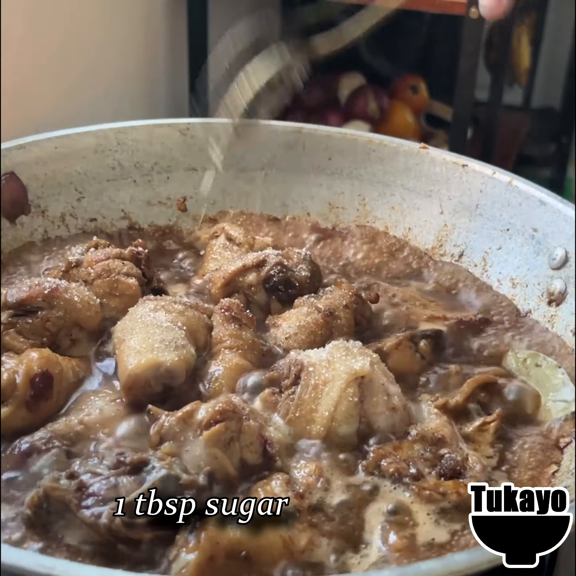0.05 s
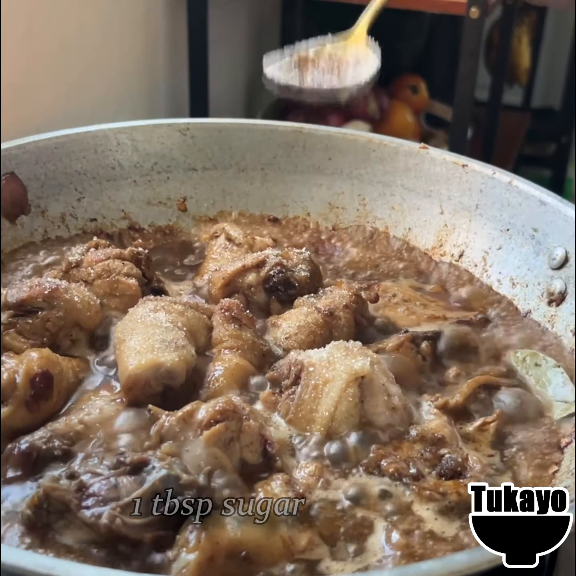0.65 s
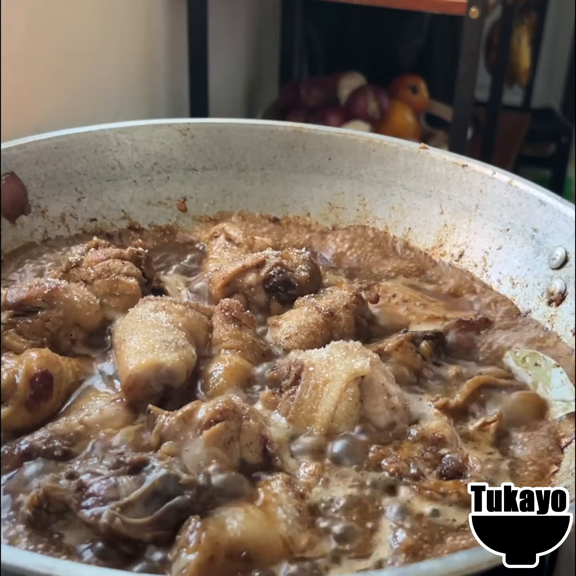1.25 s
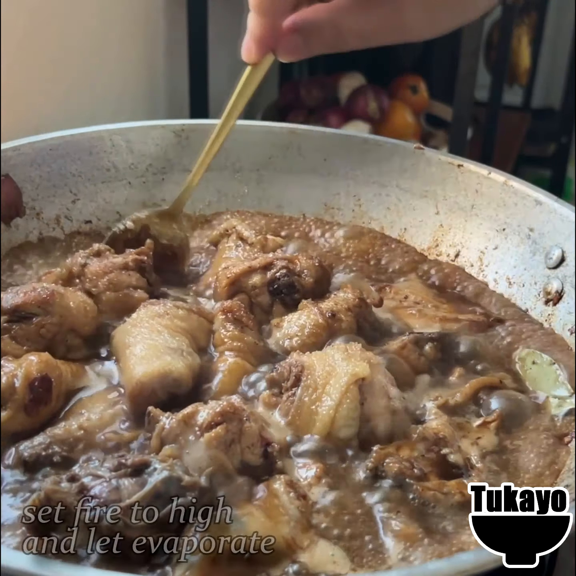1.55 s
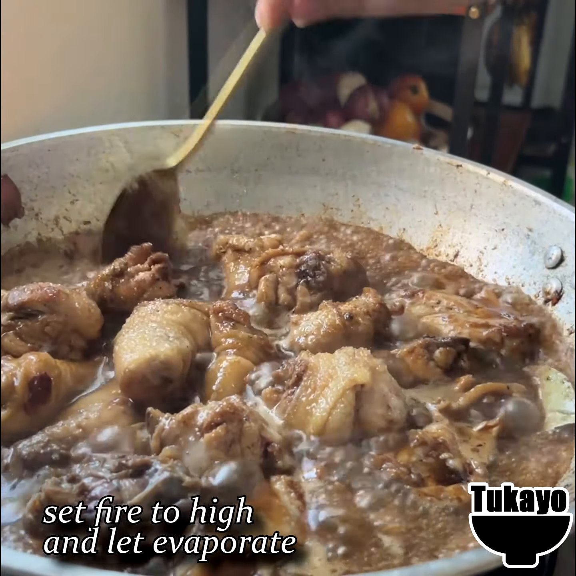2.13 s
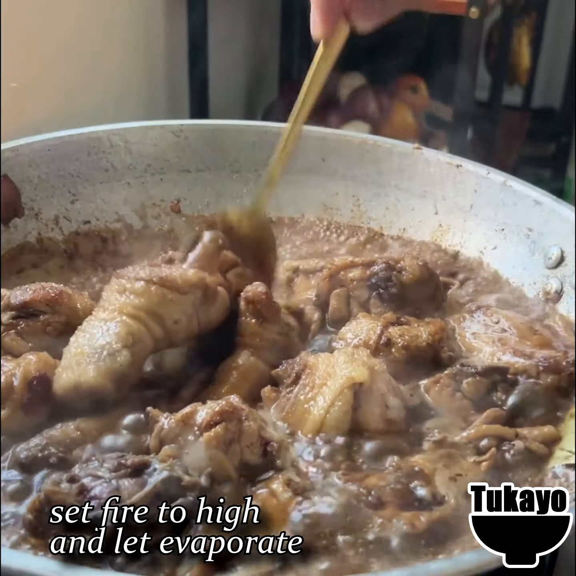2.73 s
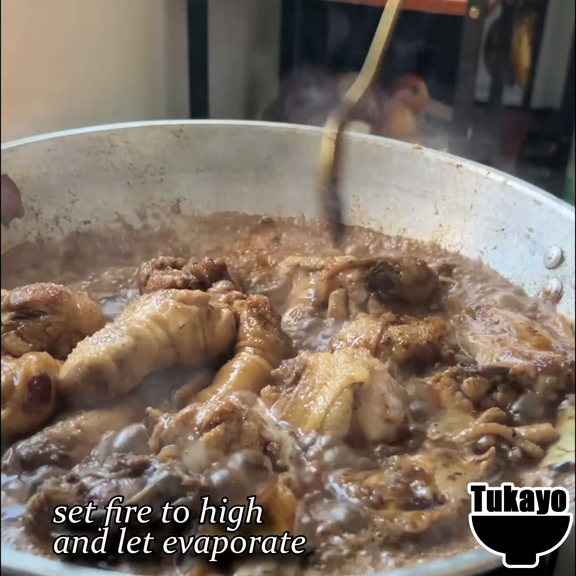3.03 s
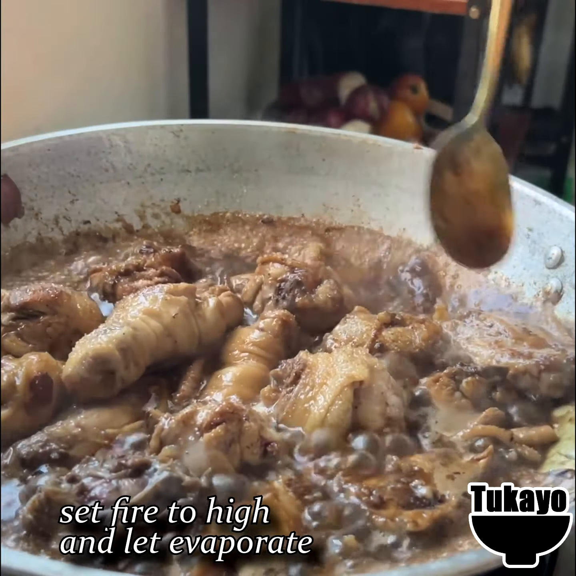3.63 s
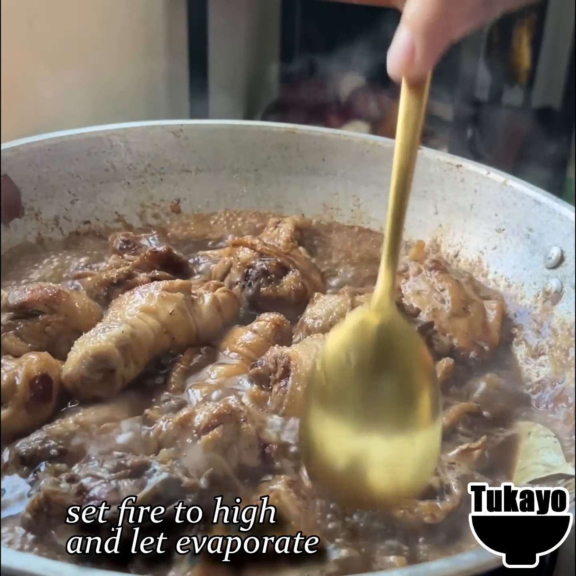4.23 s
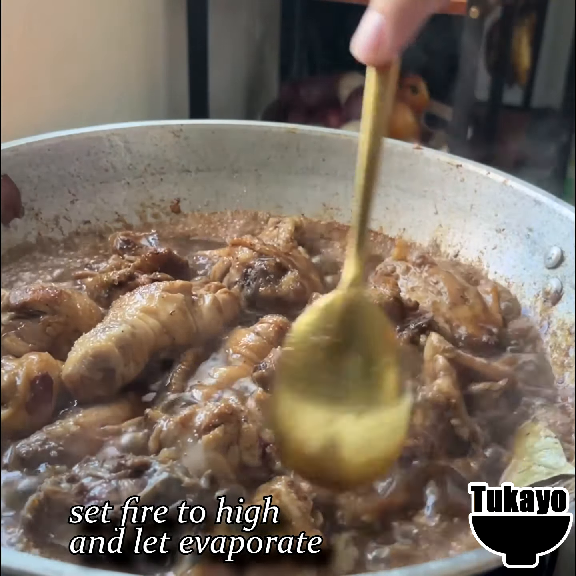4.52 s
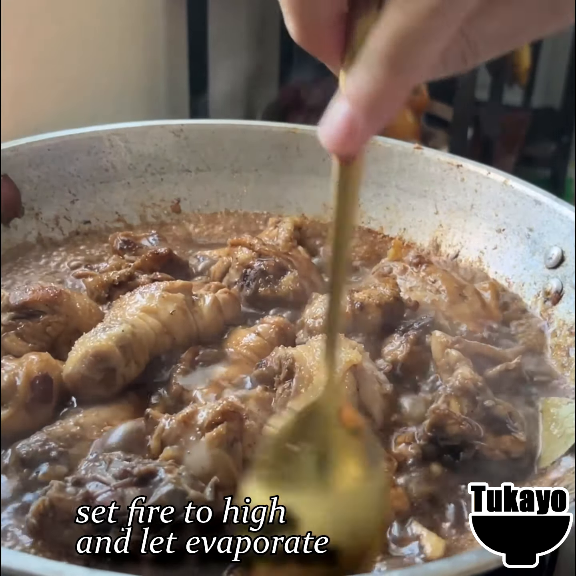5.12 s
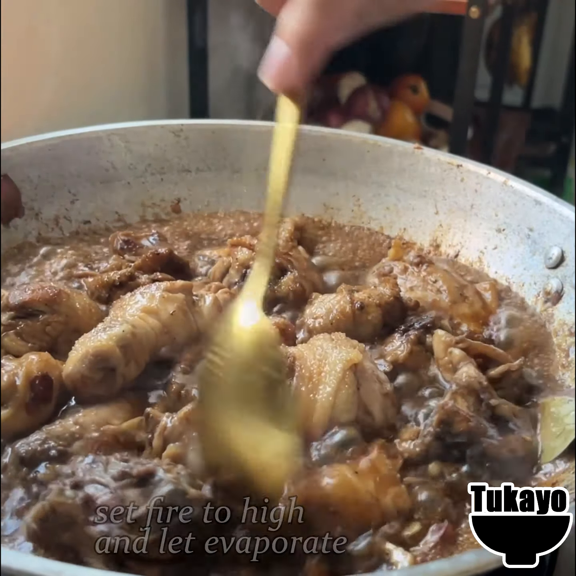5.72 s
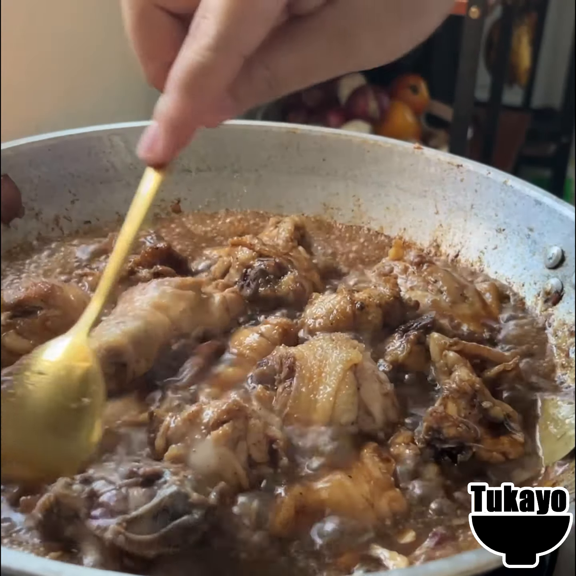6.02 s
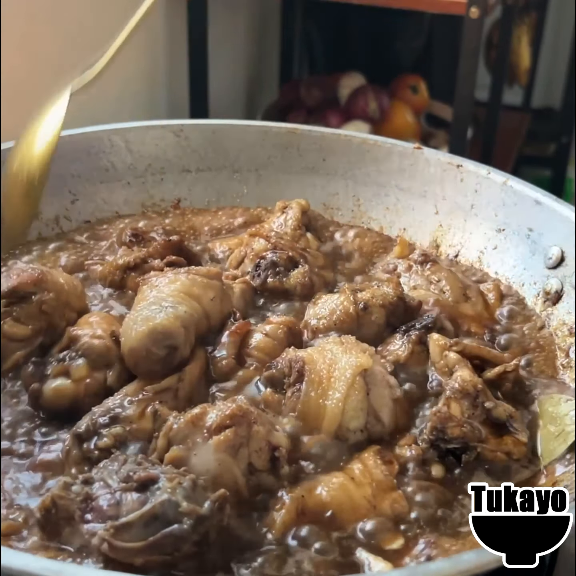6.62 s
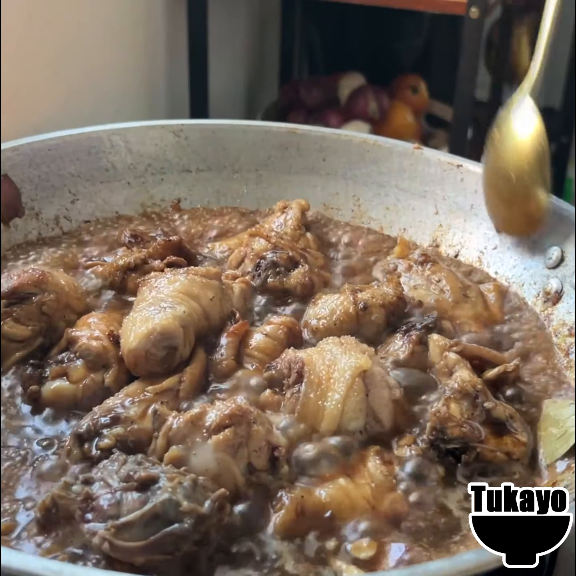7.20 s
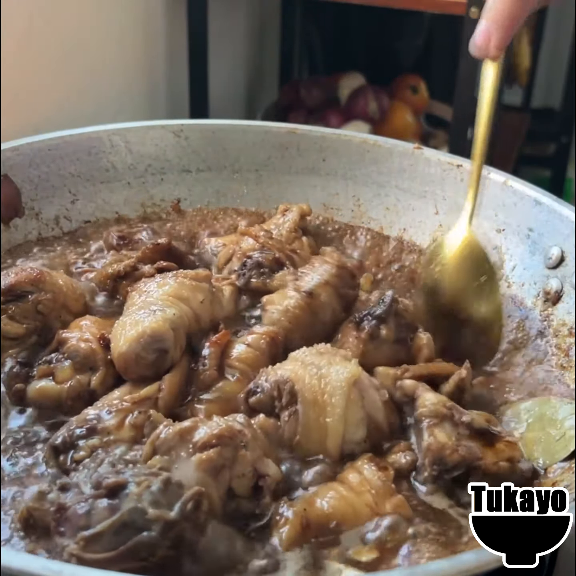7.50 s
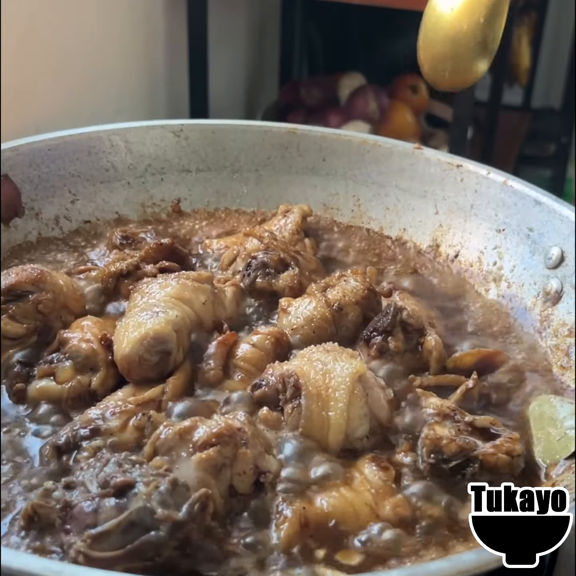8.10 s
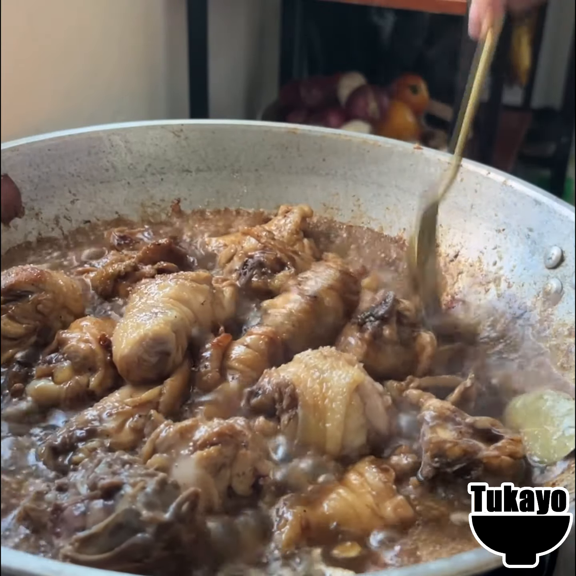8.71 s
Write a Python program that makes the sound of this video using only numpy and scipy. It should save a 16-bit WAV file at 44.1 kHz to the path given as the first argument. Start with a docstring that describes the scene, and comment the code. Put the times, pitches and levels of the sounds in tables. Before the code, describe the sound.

In a small kitchen, sauce boils hard around chicken in a wide metal pan, bubbling and fizzing over a low rumble. A spoon clinks once on a dish, then turns the pieces with soft wet sloshes. It knocks and briefly scrapes the pan at uneven intervals, loudest about halfway through. The boil carries on throughout, heard close beside the rim with a slight room echo.

```python
"""A small kitchen: sauce boils hard around chicken in a wide aluminium pan, with fizz, bursting
bubbles, a low rumble over the burner and a faint hollow tone. A spoon clinks once on a dish, then
turns the pieces: the sauce sloshes, and knocks and scrapes ring the pan's floor and wall and the spoon.
The room echoes the spoon; two closely spaced microphone ports listen from beside the rim."""
import sys
import numpy as np
from scipy import signal
from scipy.fft import rfft, irfft, next_fast_len
from scipy.io import wavfile
from scipy.ndimage import map_coordinates

SR = 44100
rng = np.random.default_rng(int(sys.argv[2]) if len(sys.argv) > 2 else 0)


def file_out(sig):
    """Save sig as 16-bit WAV at sys.argv[1]."""
    # one column per channel
    cols = np.atleast_2d(sig).T
    # limit, then scale
    lim = np.clip(cols, -1, 1)
    pcm = np.round(lim * 32767).astype(np.int16)
    wavfile.write(sys.argv[1], SR, pcm)


N = 385875

# slow drift of the boil: time_s, rumble_db, bubbling_db, fizz_db
BOIL_LEVELS = [(0.0, -41.5, -39, -39), (3.73, -37, -38, -39), (4.12, -38, -41, -40.5),
               (5.34, -39.5, -38, -40.5), (6.8, -41, -40, -41), (7.95, -38.5, -39, -40),
               (8.75, -39.5, -40.5, -40)]
# whole loaded pan: freq_hz, level_db, t60_s
BOOM_MODES = [(210, -7.5, 0.26), (236.1, -5, 0.37)]
# pan floor, damped by sauce: freq_hz, level_db, t60_s
FLOOR_MODES = [(336, -0.5, 0.09), (386.4, 0, 0.12), (407.7, -1, 0.17), (443.5, -6, 0.24),
               (458.7, -0.5, 0.14), (498, -1.5, 0.13), (645, -6.5, 0.13)]
# bare pan wall: freq_hz, level_db, t60_s
WALL_MODES = [(736, -11, 0.11), (973, -2, 0.2), (996, -0.5, 0.12), (1108, -7, 0.14), (1178, -2.5, 0.18),
              (1340, -3.5, .1), (1570, -16, .1), (1838, -2, 0.082), (1960, -12, 0.062), (2134, -6, 0.081),
              (2546, -2.5, 0.043), (2640, 0, 0.069)]
# spoon bowl pressed on metal: freq_hz, level_db, t60_s
BOWL_MODES = [(4713, 3.5, 0.075), (5200, 1, 0.021), (5100, 2, 0.031), (5570, -20, 0.14), (6614, 4, 0.04),
              (7460, 5.5, 0.057), (9500, 0, .03), (10450, -1.5, 0.037), (11770, -1.5, .04),
              (13640, -6.5, 0.036)]
# spoon-on-pan contact noise: freq_hz, level_db
CLACK_SPECTRUM = [(100, -3.5), (250, -5), (700, 0), (1050, 1), (1450, 2), (1850, 4), (2200, 0), (2550, -1),
                  (3300, 0.5), (5000, -3.5), (7000, -5.5), (11500, -14.5), (15500, -52)]


def amp(db):
    """Decibels to gain."""
    return 10 ** (np.asarray(db) / 20)


def unit(x):
    """Scale to rms 1."""
    return x / np.sqrt(np.mean(x ** 2) + 1e-20)


def noise(n=N):
    """Two unrelated white noises."""
    return rng.standard_normal((2, n))


def along(points, hz):
    """Interpolate (freq_hz, value) points on a log axis."""
    freq_hz, values = np.transpose(points)
    return np.interp(np.log(hz + 1), np.log(freq_hz + 1), values)


def curves(rows):
    """Per-sample curve for each column after time_s."""
    time_s, *columns = np.transpose(rows)
    return [np.interp(np.arange(N) / SR, time_s, column) for column in columns]


def wobble(rate_hz):
    """Smooth random curve with knots at rate_hz."""
    knots = rng.standard_normal(int(N * rate_hz / SR) + 4)
    return map_coordinates(knots, [np.arange(N) * rate_hz / SR])


def swell_at(start_s, length_s):
    """Half-sine rise and fall, 0-1."""
    return np.sin(np.pi * np.clip((np.arange(N) / SR - start_s) / length_s, 0, 1))


def filtered(x, response):
    """Apply a complex frequency response."""
    n = x.shape[-1]
    n_fft = next_fast_len(n + 8192)
    return irfft(rfft(x, n_fft) * response(np.fft.rfftfreq(n_fft, 1 / SR)), n_fft)[..., :n]


def spread(pair, spectrum):
    """Shape two unrelated signals to a (freq_hz, level_db) spectrum: partly coherent stereo, rms 1."""
    # left-right likeness: freq_hz, coherence
    likeness = [(100, .99), (260, .97), (450, .8), (1000, .58), (1500, .1), (1800, .94), (3000, .65),
                (6400, .66), (8300, .98), (10000, .8), (11800, .93), (14000, .65)]

    def response(hz):
        angle = np.arccos(np.clip(along(likeness, hz), -1, 1)) / 2
        return amp(along(spectrum, hz)) * [np.cos(angle), np.sin(angle)]

    mid, side = filtered(pair, response)
    return unit(np.array([mid + side, mid - side]))


def add(track, start_s, sound):
    """Mix a sound into a track."""
    part = track[:, max(round(start_s * SR), 0):][:, :sound.shape[-1]]
    part += sound[..., :part.shape[1]]


def ring(modes, scatter_rad, centre_hz=None, focus_db=0, detune=0):
    """Struck modes in stereo: the place of the blow favours those near centre_hz, pressure detunes them."""
    hz, db, t60_s = np.transpose(modes)[:, :, None]
    t = np.arange(SR // 2) / SR
    if centre_hz:
        db = db + focus_db * np.exp(-(np.log(hz / centre_hz) / 0.079) ** 2)
    gains = amp(db + rng.standard_normal(hz.shape))
    hz = hz * (1 + detune * rng.uniform(-0.95, 1, hz.shape))
    phase = rng.uniform(0, 2 * np.pi, hz.shape) + scatter_rad * rng.standard_normal((2,) + hz.shape)
    waves = gains * amp(-60 * t / t60_s) * np.sin(2 * np.pi * hz * t + phase)
    return waves.sum(axis=1) / np.linalg.norm(gains)


def bubbles(per_s, pitch_hz, octaves, decay_cycles, spread_db, glide, samples):
    """Stream of tiny bubbles on two channels: damped sines, pitch rising with glide."""
    when, pitch_a, pitch_b, size, bearing = rng.random((int(per_s * N / SR), 5)).T[:, :, None]
    hz = pitch_hz * 2 ** (octaves * (pitch_a + pitch_b - 1))
    strength = amp(-spread_db * np.log(np.maximum(size, .012)))
    cycles = hz * np.arange(samples) / SR
    age = cycles / decay_cycles
    rise = 1 + glide * (1 - np.exp(-age / 2))
    waves = strength * np.sqrt(hz) * np.exp(-age) * np.sin(2 * np.pi * cycles * rise)
    index = ((when * N).astype(int) + np.arange(samples)).ravel()
    gains = np.cos(2 * np.pi * bearing), np.sin(2 * np.pi * bearing)
    return unit(np.array([np.bincount(index, (waves * g).ravel(), N + samples)[:N] for g in gains]))


def contact_levels(mix_db, depth, hardness):
    """Noise, boom, floor, wall, bowl in dB. Depth: 0 wall, 1 floor. Hardness: 0 meat, 1 bare metal."""
    return np.array(mix_db) + [0, 6 * depth, 18 * depth, 0, 30 * hardness]


def kitchen_echo(x):
    """Diffuse room tail, 5 ms late; treble dies first."""
    # room decay: freq_hz, t60_s
    decay = [(200, 0.28), (2000, 0.49), (12000, 0.24)]
    hz, t, bins = signal.stft(noise(SR // 2), SR, nperseg=256)
    tail = signal.istft(bins * amp(-60 * t / along(decay, hz)[:, None]), SR, nperseg=256)[1]
    tail = spread(tail, [(100, 5), (3000, -3.5), (15000, -2.5)])
    tail = np.pad(tail / np.linalg.norm(tail[0]), ((0, 0), (SR // 200, 0)))
    return signal.fftconvolve(x, tail, axes=1)[:, :N]


def faint_tone():
    """An unsteady hollow tone comes and goes, sagging in pitch each time."""
    # tone swells: start_s, length_s, start_hz, level_db
    swells = [(4.16, 0.19, 601, -36), (4.384, 0.3, 542, -37), (5.025, 0.18, 639, -33.5),
              (7.795, 0.34, 602, -43)]
    sag_hz_per_s = 184
    out, t = np.zeros(N), np.arange(N) / SR
    for start_s, length_s, start_hz, level_db in swells:
        hz = start_hz - sag_hz_per_s * np.clip(t - start_s, 0, length_s)
        phase = 2 * np.pi * np.cumsum(hz * (1 + .032 * wobble(90))) / SR
        out += amp(level_db + 2.6 * wobble(25)) * swell_at(start_s, length_s) * np.sin(phase)
    return out


def rumble(level_db):
    """The boil heaves and rumbles from below."""
    # rumble: freq_hz, level_db
    spectrum = [(20, -34), (38, -9.5), (62, 0), (100, -3), (160, -7), (240, -7), (400, -22.5), (900, -29),
                (4000, -100)]
    return amp(level_db + 2.5 + .9 * wobble(6)) * spread(noise(), spectrum)


def fizz(level_db):
    """Fine bubbles spit at the hot metal."""
    # fizz: freq_hz, level_db
    spectrum = [(600, 1.5), (2000, 6), (3000, 4), (4000, 1.5), (5500, -1.5), (8000, -2.5), (11000, -1.5),
                (12500, -4.5), (14500, -3.5), (15500, -31)]
    spits = bubbles(per_s=2500, pitch_hz=6780, octaves=0.93, decay_cycles=0.88,
                    spread_db=-1.5, glide=0, samples=48)
    return amp(level_db + 3 + 0.083 * wobble(22)) * spread(noise() + .8 * spits, spectrum)


def bubbling(level_db):
    """Bubbles pop; thick sauce damps each in about one cycle."""
    # bubbling: freq_hz, level_db
    spectrum = [(150, -17), (330, 3), (430, -3.5), (600, 5.5), (1000, -2.5), (1500, -5.5), (1880, -1),
                (2500, -5.5), (3500, -8), (7000, -17)]
    pops = bubbles(per_s=600, pitch_hz=1650, octaves=1.5, decay_cycles=1,
                   spread_db=3, glide=.05, samples=256)
    simmer = noise() + .52 * pops
    return amp(level_db + 0.14 + 1.5 * wobble(8.3)) * spread(simmer, spectrum)


def slosh():
    """Wet pieces gulp in the sauce, rocked by the boil and shoved by the spoon."""
    # spoon shoves: start_s, length_s, level_db
    shoves = [(1.41, 0.344, -37), (1.92, 0.41, -33.5), (2.48, 0.23, -42), (6.1, 0.56, -43),
              (7.5, 0.82, -45)]
    rocking_db = -50.5
    gulps = bubbles(per_s=110, pitch_hz=296.6, octaves=1.42, decay_cycles=2.96,
                    spread_db=2.5, glide=.2, samples=2400)
    motion = amp(rocking_db) + sum(amp(db) * swell_at(start_s, length_s) for start_s, length_s, db in shoves)
    return motion * spread(gulps, [(70, 9), (150, 5.5), (900, 5.5), (2500, -10), (9000, -40)])


def bursts():
    """A big bubble's film snaps; its opening cavity rings for a few cycles."""
    # biggest bubbles: start_s, level_db, pitch_hz
    big = [(0.057, -18.5, 2100), (0.562, -24, 1990), (1.044, -22, 600), (1.611, -16.5, 1760),
           (1.709, -19, 775), (1.772, -21, 675), (3.839, -21, 1900), (7.765, -24, 1840)]
    small = [(when * N / SR, -26.5, 1510 * 2 ** (2 * pitch - 1)) for when, pitch in rng.random((8, 2))]
    out, t = np.zeros((2, N)), np.arange(SR // 20) / SR
    for start_s, level_db, pitch_hz in big + small:
        cavity = np.sin(2 * np.pi * pitch_hz * t * (1 + 3 * t))
        snap = spread(noise(len(t)), [(200, 3), (700, 0), (2200, 0), (8000, -34)])
        add(out, start_s, amp(level_db - 1) * (cavity + .5 * snap) * np.exp(-t / .003))
    return out


def dish_clink():
    """The spoon taps a dish on the right: a tick and one strong high note."""
    # struck dish: freq_hz, level_db, t60_s
    dish_modes = [(700, -25, 0.79), (1888, -23, 0.31), (3550, -0.5, 0.17), (3640, -10, 0.04),
                  (5640, -21.5, 0.12), (8400, -27, .08), (11400, -17.5, 0.048), (14600, -24, 0.045)]
    out, t = np.zeros((2, N)), np.arange(SR // 2) / SR
    note = ring(dish_modes, scatter_rad=.15) * (1 - np.exp(-t / .0008))
    tick = noise(len(t)) * np.exp(-t / 0.005)
    add(out, start_s=1.2245, sound=amp([[-6], [0]]) * (amp(1.5) * note + amp(-15) * tick))
    return out


def scrapes():
    """The spoon's edge sticks and slips unevenly; each slip shakes pan and bowl."""
    # spoon drags: start_s, length_s, level_db, depth, hardness, wall_hz
    drags = [(2.123, 0.039, -25, 0.4, 0.2, 980), (4.333, 0.077, -34.5, 1, 0.59, 1100),
             (4.729, 0.073, -24.5, 0.74, 0.49, 1750), (5.482, 0.067, -25.5, 0.7, 0.71, 1830),
             (5.528, 0.071, -22.5, 0.88, 0.49, 990), (5.582, .036, -22.5, 0.89, 0.24, 2580),
             (6.362, 0.037, -29, 0.73, 0.93, 1090), (7.277, 0.03, -26.5, 0.45, 0.64, 1830),
             (7.301, .052, -22.5, 0.02, .33, 2580), (8.544, 0.017, -26.5, 0.23, .2, 1340)]
    # drag balance: rasp_db, boom_db, floor_db, wall_db, bowl_db
    mix_db = (-1, -17, -13.5, -2.5, -19.5)
    slips_per_s = 450
    out, t = np.zeros((2, N)), np.arange(SR // 2) / SR
    damping = np.exp(-t / 0.023)  # spoon pressing on the metal
    for start_s, length_s, level_db, depth, hardness, wall_hz in drags:
        pressure = np.sin(np.pi * np.clip(t / length_s, 0, 1)).clip(0) ** .7
        slipping = rng.random(len(t)) < slips_per_s / SR
        slips = pressure * slipping * rng.uniform(.15, 1, len(t)) * rng.choice([-1, 1], len(t))
        rasp = spread(noise(len(t)), CLACK_SPECTRUM) * np.exp(-t / 0.0074)
        boom = ring(BOOM_MODES, scatter_rad=0.11) * damping
        floor = ring(FLOOR_MODES, scatter_rad=0.21, centre_hz=480, focus_db=3.5) * damping
        wall = ring(WALL_MODES, scatter_rad=.8, centre_hz=wall_hz, focus_db=9, detune=.01) * damping
        bowl = ring(BOWL_MODES, scatter_rad=.4, centre_hz=4850, focus_db=3, detune=.012)
        bowl *= np.exp(-t / .0025)
        levels_db = level_db + contact_levels(mix_db, depth, hardness)
        for db, body in zip(levels_db, (rasp, boom, floor, wall, bowl)):
            shaken = signal.fftconvolve(slips[None], body, axes=1)[:, :len(t)]
            add(out, start_s, amp(db) * unit(shaken) * np.sqrt(length_s / t[-1]))
    return out


def knocks():
    """The spoon chatters briefly on the pan; pan and bowl ring on, and the handle if loosely held."""
    # spoon blows: start_s, level_db, depth, hardness, floor_hz, wall_hz, grip_looseness
    blows = [(1.372, -22, 0, 0.83, 495, 1870, 0), (1.437, -38, .25, 0.97, 340, 800, 0),
             (1.980, -26, 0.81, 0.85, 366, 1190, 0.3), (2.132, -13.5, 0.77, 0.3, 340, 1000, 0.1),
             (3.185, -9, 0.67, .12, 396, 1190, 0.43), (3.261, -19, 0.73, 0.15, 383, 1180, 0.14),
             (3.299, -20, .25, .33, 412, 1940, 0.1), (4.316, 1.5, .28, 0.41, 397, 1065, 0),
             (4.706, -8, 0.92, 0.51, 410, 1840, 0), (5.149, -6, 0.83, 0.46, 482, 2130, 0.06),
             (5.453, -13, 1, .72, 437, 1830, 0.22), (5.974, -10.5, 0.37, 0.06, 544, 1090, 0.05),
             (6.301, -9, 0.73, 0.63, 333, 1090, 0), (7.243, -8.5, 0.2, 0.82, 400, 1810, 1),
             (8.465, -16.5, .15, 0.67, 422, 1250, 0.13)]
    # blow balance: clack_db, boom_db, floor_db, wall_db, bowl_db
    mix_db = (-5.5, -17.5, -12, -8, -18.5)
    # free spoon handle: freq_hz, level_db, t60_s
    handle_modes = [(3141, -0.5, 0.31), (3900, 0.5, 0.36)]
    out, t = np.zeros((2, N)), np.arange(SR // 2) / SR
    onset = 1 - np.exp(-t / .0025)  # heavy low modes start late
    choke = np.exp(-(t / .065) ** 4)  # fingers stop the handle
    for start_s, level_db, depth, hardness, floor_hz, wall_hz, looseness in blows:
        clack_db, boom_db, floor_db, wall_db, bowl_db = level_db + contact_levels(mix_db, depth, hardness)
        clack = spread(noise(len(t)), CLACK_SPECTRUM) * (np.exp(-t / 0.0063) + 0.084 * np.exp(-t / 0.045))
        edge = spread(noise(len(t)), [(3500, -36), (4800, 3), (12000, -0.5), (16000, -17)])
        edge *= np.exp(-t / 0.0042)
        boom = ring(BOOM_MODES, scatter_rad=0.096)
        floor = ring(FLOOR_MODES, scatter_rad=0.31, centre_hz=floor_hz, focus_db=10.5)
        wall = ring(WALL_MODES, scatter_rad=.8, centre_hz=wall_hz, focus_db=8, detune=.01)
        # light taps favour one bowl mode, hard blows the upper handle mode
        bowl = ring(BOWL_MODES, scatter_rad=.5, centre_hz=6700, focus_db=-0.66 * level_db, detune=.005)
        handle = ring(handle_modes, scatter_rad=0.32, centre_hz=3903, focus_db=bowl_db / 2 + 11.5)
        pan = onset * (amp(boom_db) * boom + amp(floor_db) * floor) + amp(wall_db) * wall
        spoon = amp(bowl_db) * (bowl + edge) + looseness * amp(level_db - 2) * choke * handle
        add(out, start_s, amp(clack_db) * clack + pan + spoon)
    return out


def scene():
    """The boil, with the spoon and its echo on top."""
    pan, dish = knocks() + scrapes(), dish_clink()
    echo = kitchen_echo(amp(-12) * pan + amp(-17) * dish)
    rumble_db, bubbling_db, fizz_db = curves(BOIL_LEVELS)
    boil = fizz(fizz_db) + bubbling(bubbling_db) + rumble(rumble_db)
    return boil + slosh() + bursts() + faint_tone() + pan + dish + echo


def record(dry):
    """Two ports differing in level and phase, then soft clip and low-pass."""
    # left port's phase lead: freq_hz, lead_rad
    lead = [(100, 0), (1400, .5), (1850, .05), (3000, 1), (4900, .45), (6200, -.9), (7700, -2.75),
            (8700, -3.2), (11000, -5.9), (12500, -6.4), (15000, -9)]
    # left over right: freq_hz, level_db
    tilt = [(60, 0.5), (400, 2), (720, 4), (1500, 1), (2800, 2), (4200, 4.5), (6000, 2), (8000, 0)]
    sides = np.array([[1], [-1]]) / 2
    ports = filtered(dry, lambda hz: amp(sides * along(tilt, hz)) * np.exp(1j * sides * along(lead, hz)))
    clipped = ports / (1 + np.abs(ports) ** 6) ** (1 / 6)
    return filtered(clipped, lambda hz: hz < 15700)


dry = scene()
out = record(dry)
file_out(out)
```